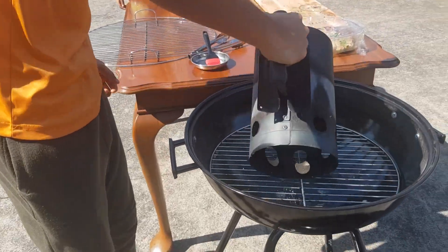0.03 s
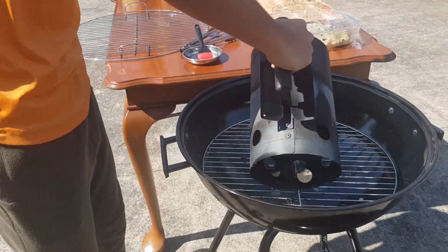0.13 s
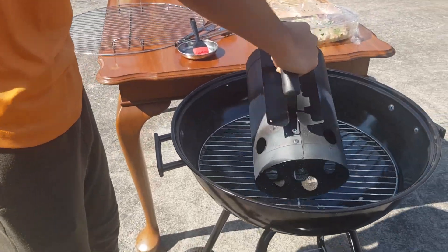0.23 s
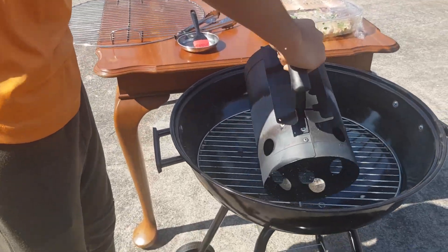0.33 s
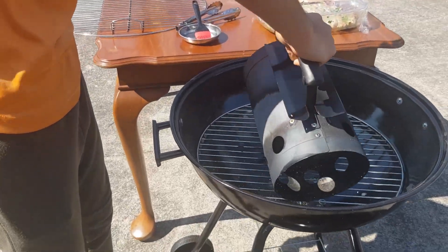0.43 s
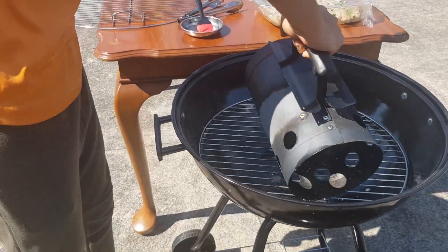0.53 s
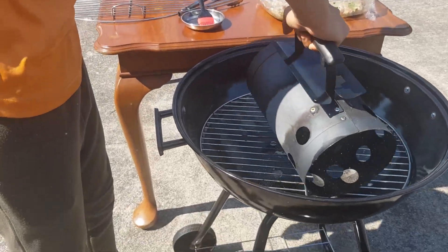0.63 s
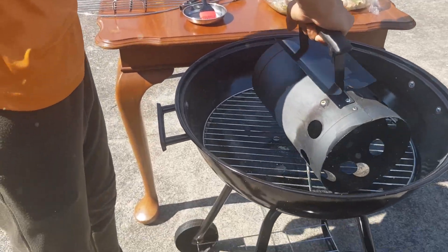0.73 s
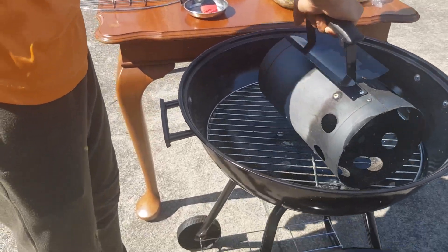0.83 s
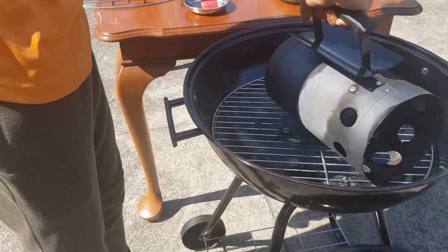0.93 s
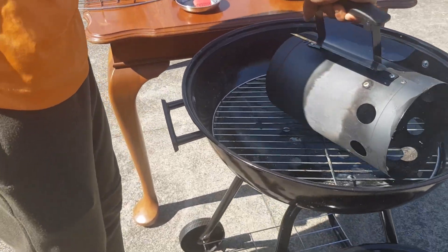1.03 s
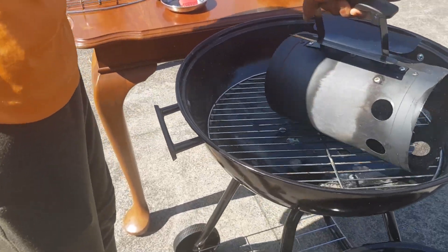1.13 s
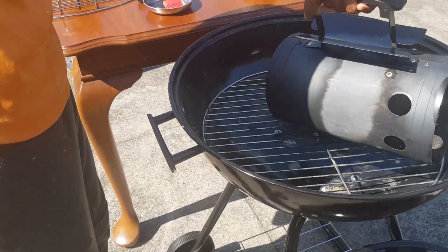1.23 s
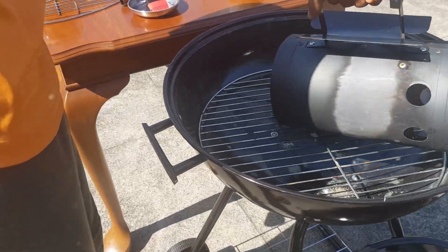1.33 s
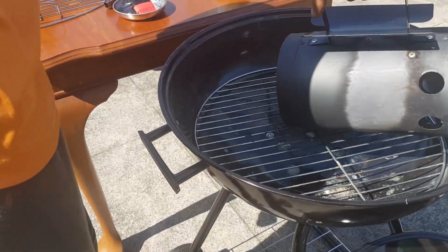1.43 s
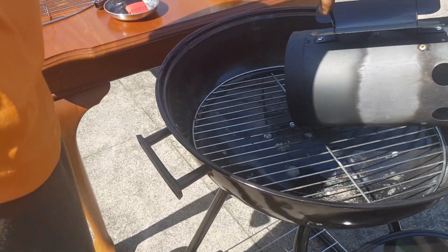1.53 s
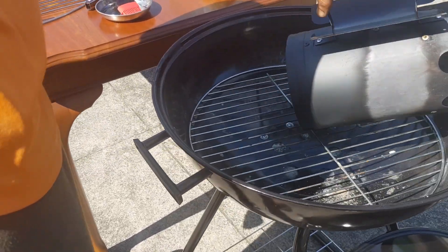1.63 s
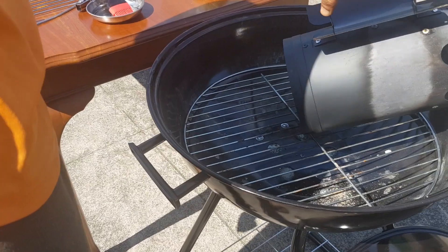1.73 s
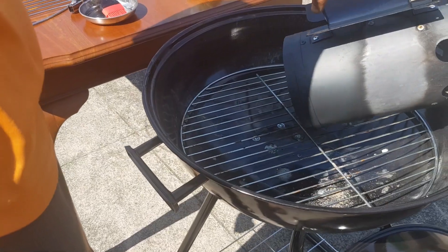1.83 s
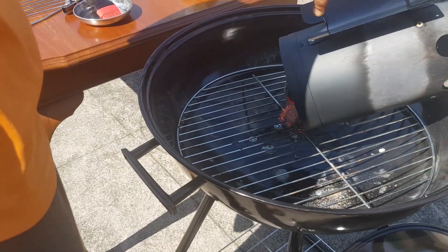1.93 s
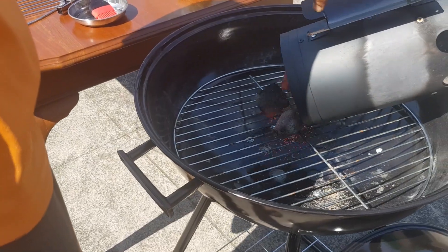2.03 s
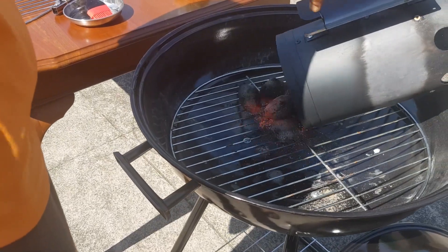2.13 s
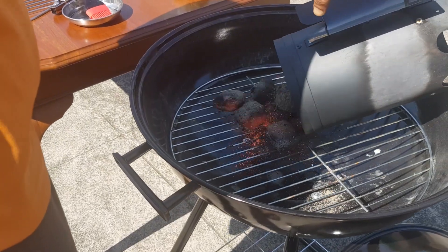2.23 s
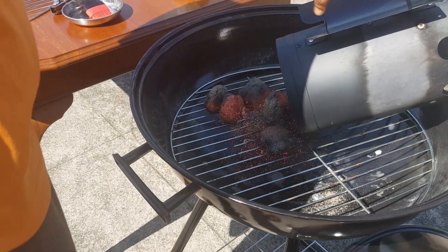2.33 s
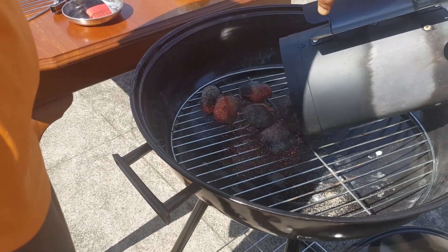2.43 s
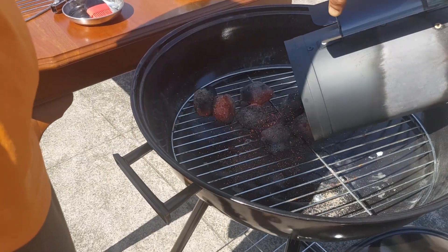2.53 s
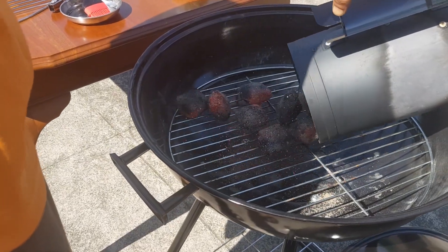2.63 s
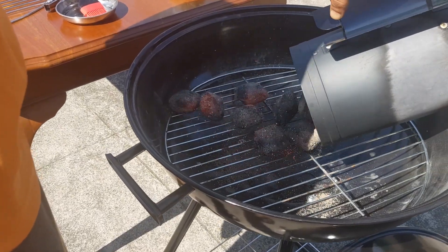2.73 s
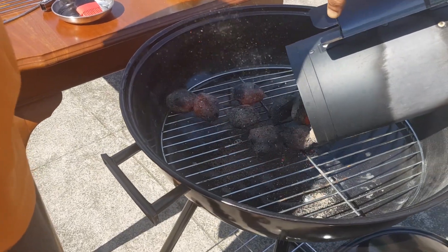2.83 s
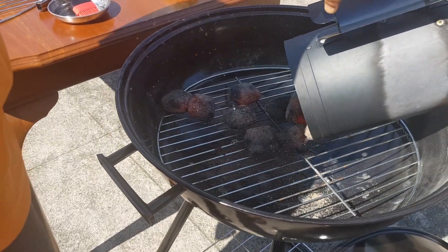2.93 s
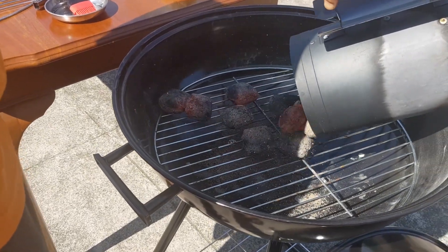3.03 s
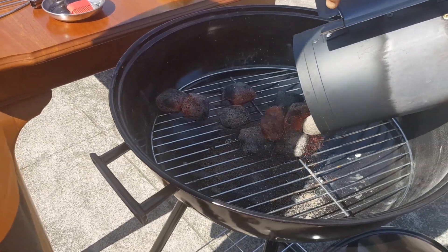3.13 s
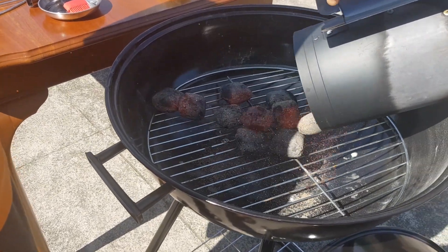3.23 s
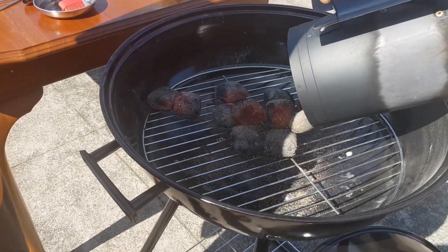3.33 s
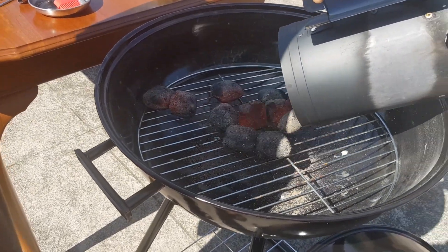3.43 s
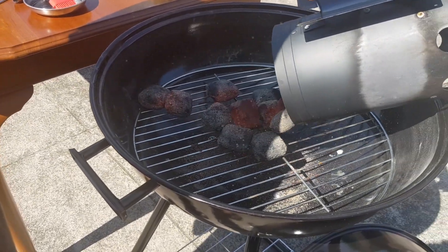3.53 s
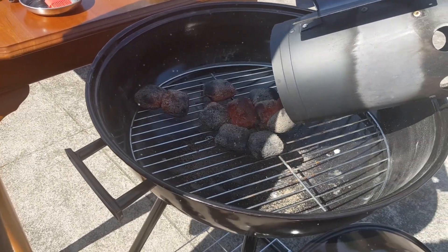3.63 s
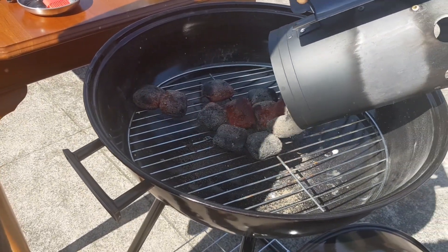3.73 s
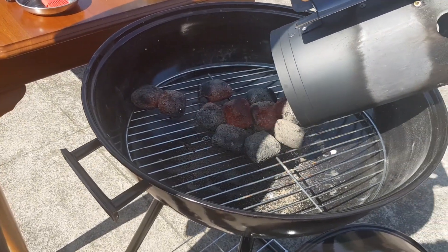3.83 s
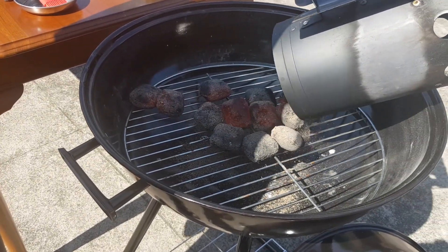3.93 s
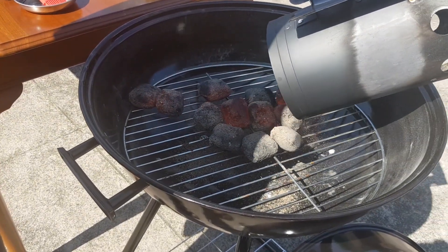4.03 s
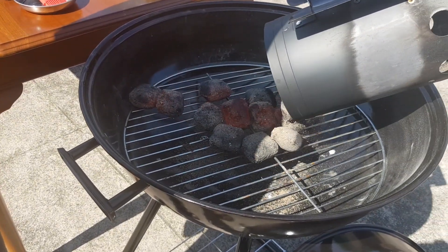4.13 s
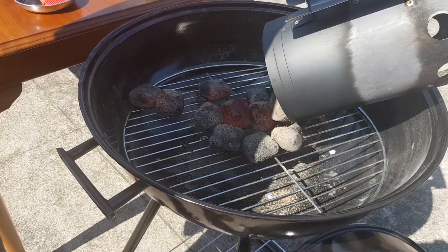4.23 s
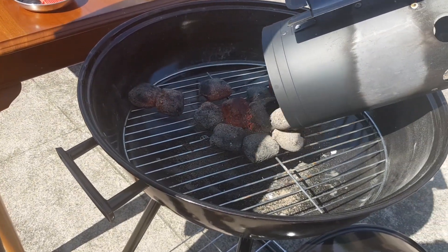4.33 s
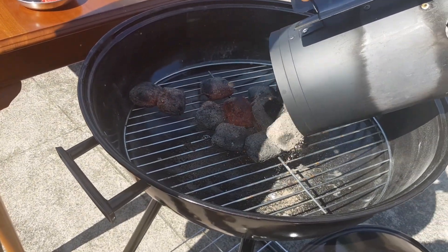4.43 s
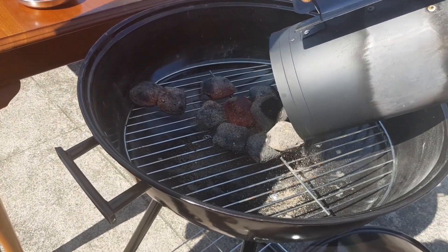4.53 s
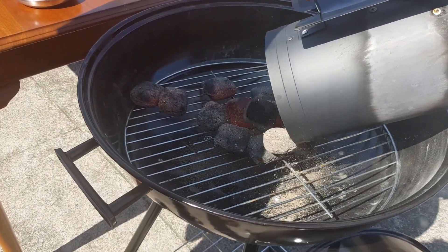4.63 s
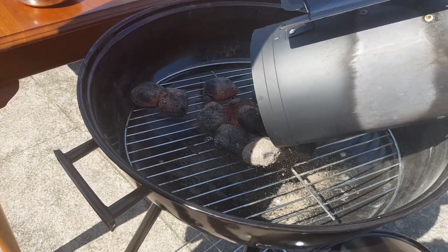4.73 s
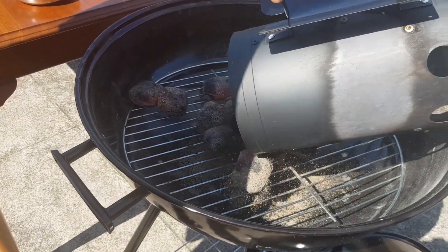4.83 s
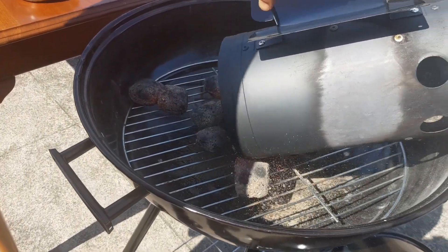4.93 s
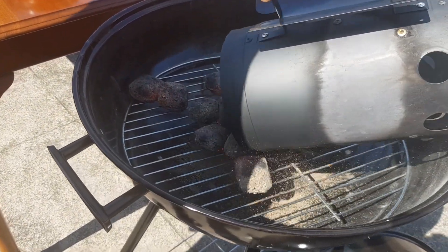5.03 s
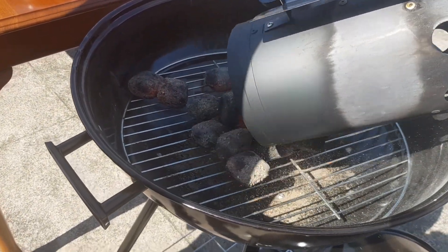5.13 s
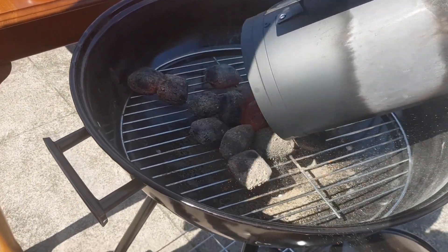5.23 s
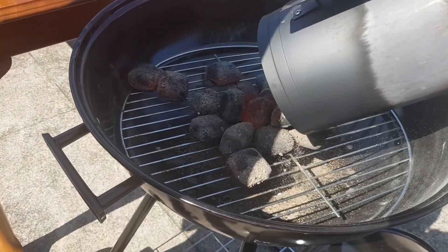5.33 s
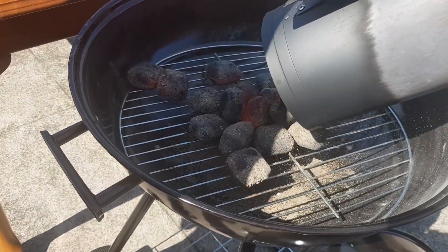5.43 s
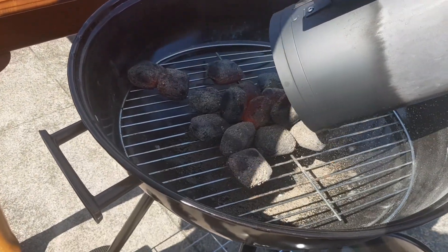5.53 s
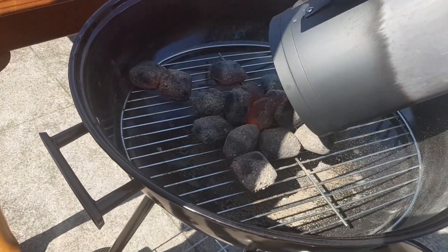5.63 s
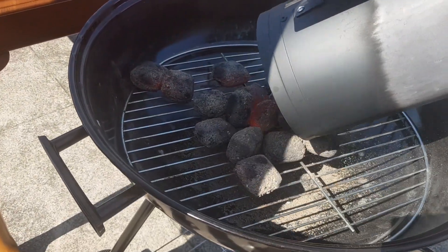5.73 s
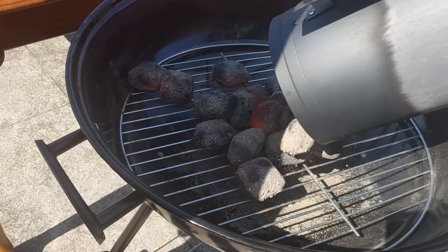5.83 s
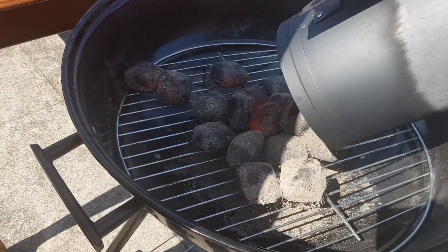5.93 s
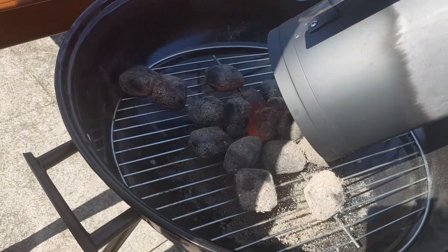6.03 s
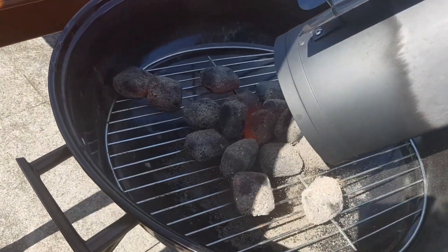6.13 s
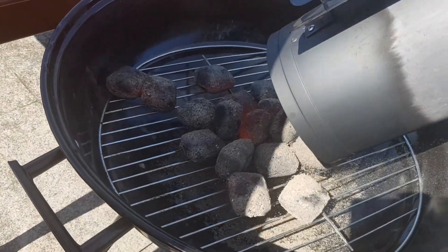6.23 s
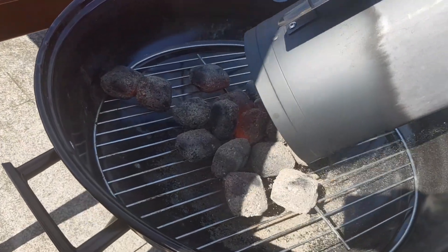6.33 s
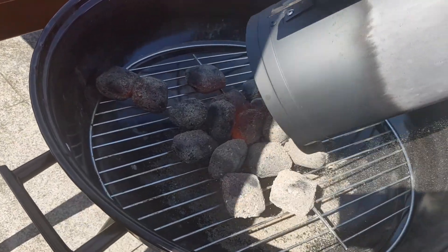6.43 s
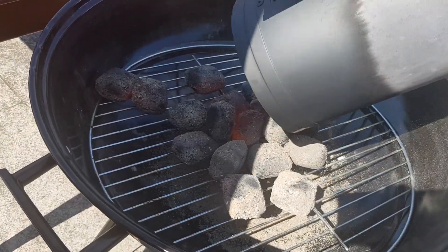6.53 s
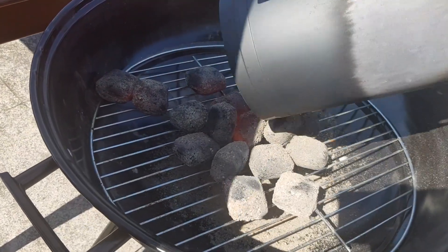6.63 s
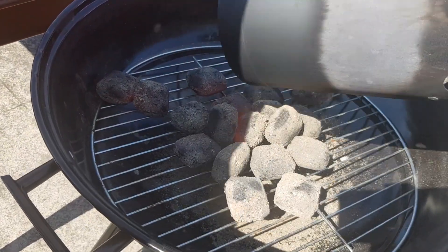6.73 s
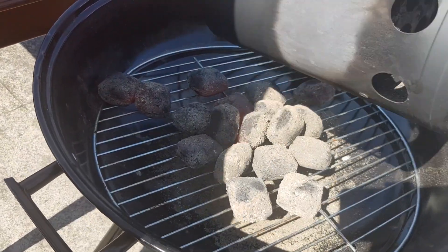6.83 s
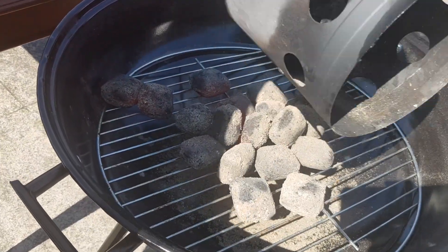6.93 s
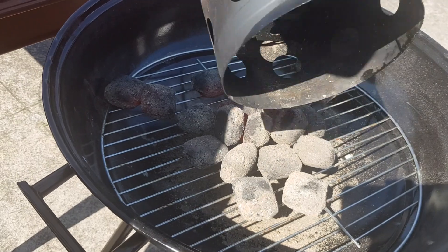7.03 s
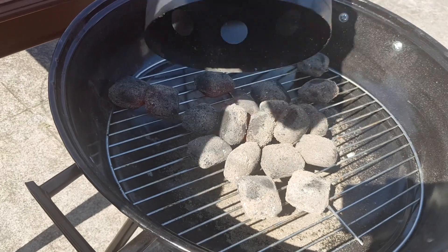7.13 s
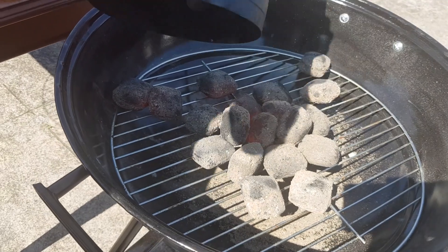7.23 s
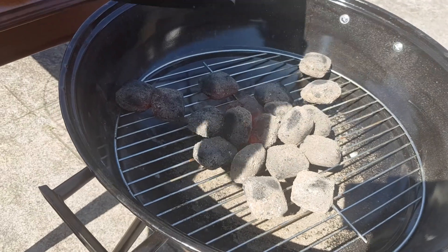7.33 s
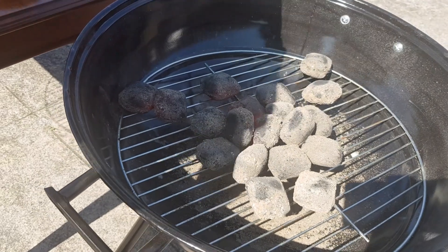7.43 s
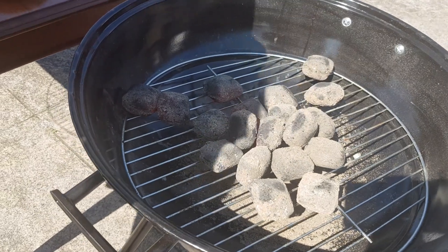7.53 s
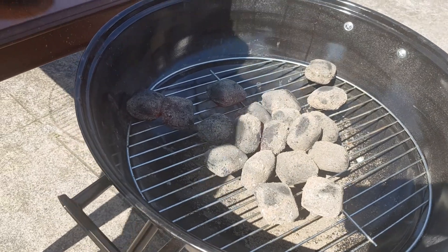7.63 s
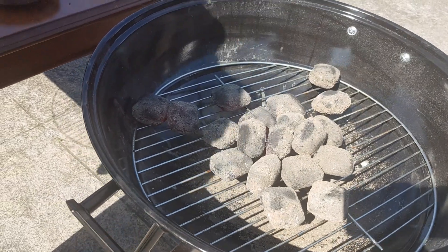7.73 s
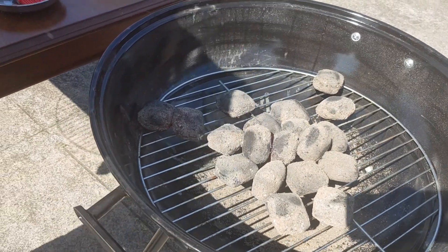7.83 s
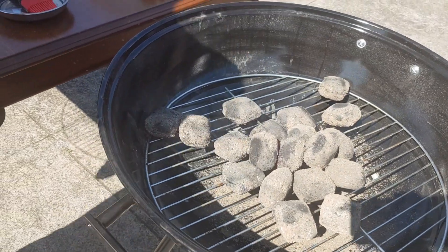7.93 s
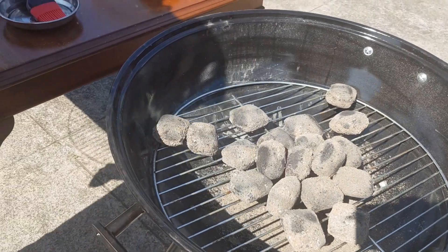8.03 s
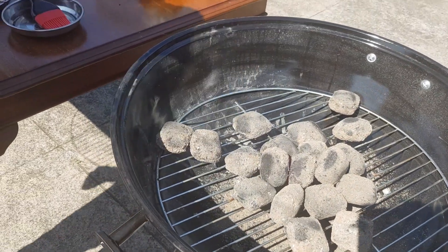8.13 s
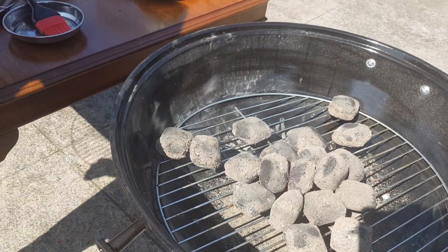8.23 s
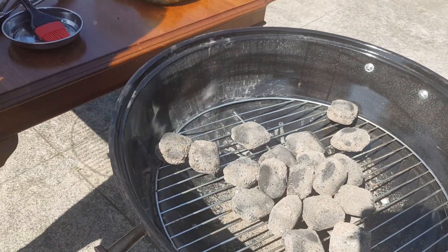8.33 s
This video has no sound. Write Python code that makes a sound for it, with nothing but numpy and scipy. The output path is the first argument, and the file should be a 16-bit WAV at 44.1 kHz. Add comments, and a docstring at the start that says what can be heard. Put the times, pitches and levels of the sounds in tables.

```python
"""Hot charcoal lumps slide out of a sheet-steel chimney onto the wire grate of a round grill, outdoors.
Each landing is a quick cluster of blows that rings bowl, grate and sheet, made of many fading modes;
between them lumps and ash roll as random clicks on the same steel, and small pieces clink or snap.
Gusts, built from short pressure waves, buffet the two microphone ports over a faint outdoor hiss.
Slow modes sing on after some blows, and near the end the lifted chimney scrapes thinly."""
import sys
import numpy as np
from scipy import signal
from scipy.fft import rfft, irfft, next_fast_len
from scipy.io import wavfile
from scipy.ndimage import uniform_filter1d

SR = 44100
rng = np.random.default_rng(int(sys.argv[2]) if len(sys.argv) > 2 else 0)


def output_pcm(signal):
    """Save a mono or channel-first signal as 16-bit PCM at the path in sys.argv[1].

    Samples are clipped to [-1, 1] before scaling.
    """
    pcm = np.clip(np.atleast_2d(signal).T, -1, 1) * 32767
    wavfile.write(sys.argv[1], SR, np.round(pcm).astype(np.int16))


def how_loud(loudness_db):
    """Turn decibels into a plain amplitude multiplier (0 dB gives 1, 20 dB gives 10)."""
    steps = np.asarray(loudness_db, float) / 20
    return 10 ** steps


N = 370080
T = np.arange(N) / SR
SIZE = next_fast_len(N + 2 * SR)  # transform length, with room for the rings to fade

# Levels in the tables are relative: random swings and the final gain come on top.
# What keeps moving between knocks: (time [s], rolling lumps [dB], trickling ash [dB])
ROLLING = [(0.0, -79, -65.5), (0.27, -105, -70), (1.62, -90, -79.5), (1.73, -76, -64.5), (1.83, -64.5, -53),
           (2.0, -38, -46), (2.12, -38, -45.5), (2.28, -42.5, -59.5), (2.46, -52.5, -64),
           (2.98, -66.5, -75), (3.14, -51, -64.5), (3.29, -60.5, -70), (3.78, -69, -61), (3.98, -57, -59),
           (4.44, -68, -70), (4.72, -58, -65.5), (4.99, -59, -61.5), (5.21, -61.5, -60.5),
           (5.42, -74.5, -72.5), (5.75, -68, -67), (5.89, -69.5, -69.5), (6.22, -69.5, -70.5),
           (6.45, -91, -81.5), (7.0, -101, -83)]
# Coal meeting steel, from a chip's tap (2 ms) over a lump's landing (6 ms) to a slide (18 ms):
# (time [s], blow [dB], tumble [ms], bowl share [dB], hardness [dB])
KNOCKS = [(0.122, -28.5, 5.5, -0.5, 10), (0.177, -23, 17.3, -4, 2.5), (0.2755, -32.5, 5.5, 4, 5),
          (0.6888, -28, 14.8, -18, 2), (0.7438, -23.5, 13.6, -4.5, 1), (1.411, -31.5, 12, -16, 8),
          (1.4968, -40.5, 1.45, -6.5, 10.5), (1.824, -7, 5.75, 1.5, -10), (1.9239, 3.5, 4.67, -1.5, -5),
          (1.9738, -1.5, 6.1, -4.5, -1), (2.0202, 10, 5.9, -10.5, -2), (2.0654, 13, 12, -15.5, -2.5),
          (2.084, 10.5, 10.4, -14.5, -3), (2.1114, 11, 7.5, -31.5, -5), (2.1542, 10.5, 6.6, -31.5, -4),
          (2.2063, 9, 8, -19, -4), (2.236, 6, 12, -22, -4.5), (2.41, -2, 8.1, -10, -6),
          (2.6802, -21.5, 2.06, 3, -1), (2.935, -27, 2.73, -0.5, 3.5), (2.984, -31.5, 1.4, -1, 2.8),
          (3.0455, -22, 2.36, 5, -1), (3.077, -20.5, 2.7, 0.5, 0), (3.1188, -36, 2.1, -7, 9),
          (3.16, -20, 2.7, 2, 3.5), (3.23, -12.5, 3.0, 0.5, 3.5), (3.412, -17.5, 1.97, -5, -1),
          (3.7798, -3.5, 7.54, -4, -4.5), (3.9089, 3, 7.84, -4.5, -3.5), (4.0803, -13.5, 17.3, -2.5, -8),
          (4.2389, -21, 7.1, 3, -23), (4.315, -8.5, 5.9, -6.5, -13), (4.375, -17.5, 10.7, 1.5, 3),
          (4.396, -31.5, 5.6, -10, 11.5), (4.5393, -31, 1.95, -4, 5.5), (4.576, -1, 6.36, -4.5, -7.5),
          (4.8018, 1.5, 8, -7, -8), (4.815, 5, 7.76, -5, -3), (4.8798, -4, 13.5, -2.5, -2),
          (4.9386, -16, 19.8, 2, 1), (5.0864, -8.5, 13.7, -3, -11.5), (5.2354, -8.5, 5.7, -1.5, -11.5),
          (5.3809, -15, 5.8, 1, -16), (5.6441, -18.5, 19.7, -7.5, 6), (5.7002, -21, 16, 2.5, -1.5),
          (5.806, -8.5, 5.25, -7.5, -6.5), (5.908, -13, 6.6, -4, -5), (5.9637, 10.5, 5.92, -8, -6.5),
          (5.975, 5, 5.95, -20, -2.5), (6.005, -10.5, 6.2, -13, -24), (6.163, -20, 4.7, -4, -3),
          (6.2414, -13.5, 5, -3.5, -6), (6.2913, -4, 6.15, -9, -8.5), (6.4096, -32, 2.8, 3.5, 0.5),
          (6.672, -35.5, 1.5, -1, -12), (6.787, -44, 2.8, -22, 4), (7.1484, -36.5, 13, 6, 4.5),
          (7.184, -46, 2.1, -5, 5), (7.33, -39, 2.5, -4.5, 6), (7.446, -38, 3.1, -4.5, 2),
          (7.7595, -62.5, 2.3, -4, 16.5), (8.02, -51, 1.8, -2, 1)]
# Spectrum of the ringing steel: (frequency [Hz], level per Hz [dB])
STEEL_COLOUR = [(120, -36.5), (200, -14.5), (543, -8.5), (1060, -20), (1250, -2), (1590, -0.5),
                (1770, -1.5), (2370, -4), (2590, -10.5), (3230, -14), (3600, -17.5), (5180, -16.5),
                (6550, -24.5), (10900, -25), (15400, -38.5)]
# How long the steel takes to fade by 60 dB: (frequency [Hz], fade time [s])
STEEL_FADE = [(200, 0.66), (1500, 0.29), (5000, 0.29), (15000, 0.11)]
# Stereo width of the steel: (frequency [Hz], side minus mid [dB])
STEEL_SIDE = [(200, -20), (380, -24.5), (700, -6.5), (1290, -5), (2380, -0.5), (4400, 0.5), (8120, 1),
              (15000, 2)]
# Modes that stand out of the dense ring: (frequency [Hz], relative level [dB], 60 dB fade time [s])
STRONG_MODES = [(192.8, 13, 0.54), (349.8, 7, 0.4), (1294, -1, .25), (1458, 5, 0.2), (1568, 13.5, 0.3),
                (1637, 10, 0.21), (1667, 11, 0.26), (1840, 5, 0.34), (2007, -2, 0.25), (2130, 0.5, 0.15),
                (2346, 2, .18), (2746, 2, 0.16), (4320, 3.5, 0.15), (4460, 5.5, 0.13), (4925, 1.5, 0.097)]
# Upper edges of bowl, grate and sheet, with grit above: (frequency [Hz])
PART_TOPS = [1000, 2900, 6300]
# Wind on the ports: (time [s], level [dB], left minus right [dB])
GUSTS = [(0.0, -66.5, 3), (0.4, -65.5, -13), (0.63, -50, 3), (0.91, -46, -6), (0.99, -41.5, 1.5),
         (1.47, -41, 1), (1.63, -52, -22), (1.8, -40.5, -14), (2.08, -41, -8.5), (2.2, -50, -10.5),
         (2.73, -44, 7), (2.97, -62.5, -11), (3.2, -51, -20), (3.62, -77, -30), (3.9, -71, -26),
         (4.55, -62, -8), (5.0, -45, -5), (5.19, -53.5, -27), (5.5, -36.5, -4), (5.77, -37, -3),
         (5.88, -54, -22), (5.97, -41.5, -1.5), (6.55, -69.5, -27.5), (6.78, -53.5, -19), (6.92, -66, -34),
         (7.0, -51, -4), (7.14, -64, -26), (7.5, -45.5, 1.5), (8.1, -55, 4), (8.21, -49.5, 15),
         (8.39, -50, -2)]
# Spectrum of the wind: (frequency [Hz], level per Hz [dB])
GUST_COLOUR = [(20, -24.5), (55, 6.5), (102, 0.5), (189, -12.5), (325, -18), (433, -40.5), (676, -48)]
# The hardest wind pops: (time [s], level [dB], pitch [Hz], left minus right [dB])
WIND_POPS = [(0.616, -30, 65, -7), (0.542, -34.5, 76, -1), (0.966, -28, 69.6, -5), (1.011, -23, 94, 3),
             (1.072, -29.5, 86.1, 2), (1.157, -34, 57, -11), (1.445, -20, 65.5, -1), (1.861, -25.5, 54, 2),
             (5.297, -21, 74, 0.2), (5.748, -30, 115, -4), (5.937, -29, 103, -5), (7.459, -32, 103.4, -1),
             (7.579, -32, 81.5, 2), (7.697, -35, 119, 6.5), (7.872, -35.5, 59, -2), (1.162, -43, 298, 13),
             (1.254, -44, 326, 3), (1.289, -33.5, 240, -2), (6.744, -42, 294, 3), (8.072, -39, 90.2, 0),
             (8.249, -47, 370, -11), (8.273, -45.5, 190, 8.5)]
# Spectrum of the outdoor hiss: (frequency [Hz], level per Hz [dB])
AIR_COLOUR = [(180, -25.5), (330, -1.5), (433, -6), (800, -16.5), (1900, -22.5), (4370, -12.5),
              (6410, -22.5), (11500, -22), (15200, -19.5)]
# Single pieces clinking or thudding on thin sheet, each at the pitch of its size:
# (time [s], level [dB], pitch [Hz])
TICKS = [(0.1194, -45.5, 2186), (0.3331, -50, 4200), (0.4053, -46, 4320), (0.4534, -52, 4150),
         (0.488, -50.5, 4200), (1.821, -33, 507), (1.875, -37.5, 510), (2.022, -29, 334), (2.081, -32, 413),
         (2.196, -38, 350), (2.245, -36.5, 395), (2.6768, -45.5, 1620), (3.0762, -35.5, 1495),
         (3.232, -44.5, 1380), (3.4094, -49, 1654), (4.028, -46, 1380), (4.183, -48.5, 3600),
         (4.239, -48, 397), (4.317, -43.5, 1600), (4.414, -43.5, 2270), (4.536, -54, 2480),
         (4.864, -39.5, 1460), (5.103, -42, 412), (6.165, -49, 2360), (6.365, -51.5, 1910),
         (5.8103, -30, 1576), (6.59, -58.5, 600), (6.6722, -56, 1560), (7.175, -58.5, 893),
         (7.3304, -56.5, 2246)]
# Slow modes of bowl and wire that sing on after some blows:
# (time [s], level [dB], pitch [Hz], 60 dB fade time [s])
SINGING_MODES = [(3.91, -74.5, 748.5, 2.1), (4.81, -56.5, 754, 3.4), (4.885, -47, 3200, .35),
                 (5.645, -51, 2280, 0.32), (5.69, -47, 3330, 0.23), (5.97, -65.5, 746, 2.1),
                 (6.3, -64, 747, 2.0), (6.69, -68.5, 2235, 0.37)]
# The lifted chimney scrapes thinly: (time [s], pitch [Hz], level [dB])
SCRAPE = [(7.0, 2820, -76), (7.07, 2520, -69), (7.12, 2860, -74), (7.17, 2700, -78)]

SPOTS = 4  # places on the steel that can be struck
CRACK, CRACK_S = 3.36, 0.0059  # extra strength and decay of the first instant, before coal damps the steel
# first touch against all later ones: at a tumble of 1 ms, and per doubling of the tumble
FIRST_DB, FIRST_DB_PER_DOUBLING = 9, -7
# harder contact lifts the sheet by the hardness and the grit by more
GRIT_DB, GRIT_PER_HARDNESS = -6.5, 1.6
SHIFT_SCALE = 2.0  # dB per unit of walk(): rolling pieces wander between bowl, grate, sheet and grit
HOLLOW_HZ, HOLLOW_Q, HOLLOW_DEPTH = 960, 2.5, 0.6  # the dip between bowl and grate; depth 0-1
# stronger wind brings smaller eddies: extra dB per octave for each dB of gust above the usual
GUST_USUAL_DB, GUST_BRIGHTENS = -49, 0.064
PORT_LAG_CYCLES = 0.25  # the wave of a hard pop lags this much at the right port
WIND_LOW_HZ = 48.7  # the wind holds little below this pitch
# 60 dB fade time at this pitch; small pieces and dull thuds die sooner
TICK_FADE_S, TICK_FADE_HZ = 0.11, 1600
# a chip's tap (tumble under TAP_MS) also snaps drily: levels against the blow, pitches of snap and wire ping
TAP_MS, SNAP_DB, SNAP_HZ, PING_DB, PING_HZ = 4, -13, 1800, -26, 5050


def on_log(table, hz):
    """Read a (frequency, value) table on a logarithmic pitch scale."""
    at, value = np.transpose(table)
    return np.interp(np.log(np.maximum(hz, 1)), np.log(at), value)


def in_time(table):
    """Draw the columns of a (time, value, ..) table as curves, one value a sample."""
    s, *columns = np.transpose(table)
    return np.array([np.interp(T, s, column) for column in columns])


def walk(rate):
    """Random levels, rate of them a second, smoothed twice; spread near 1.6."""
    k = int(SR / rate)
    steps = np.repeat(rng.standard_normal(N // k + 1), k)
    return 2.224 * uniform_filter1d(uniform_filter1d(steps, k), k)[:N]


def grains(rate, scatter_db):
    """Clicks at random moments, a few much larger than the rest; rms 1."""
    chance = rng.random((3, N))
    happens = chance[0] < rate / SR
    size = how_loud(scatter_db * np.minimum(-np.log(1 - chance[2]), 3.5))
    x = happens * np.sign(chance[1] - 0.5) * size
    return x / np.sqrt(np.mean(x ** 2))


def add_at(out, s, wave):
    """Mix a short wave into out, in place, from time s on."""
    start = int(s * SR)
    out[:, start:start + wave.shape[-1]] += wave


def pop(hz, cycles, phase):
    """A short push of air: a few cycles at most under a smooth hump, peak near 1."""
    t = np.arange(int(cycles * SR / hz))
    return np.hanning(len(t)) * np.sin(2 * np.pi * (hz * t / SR + phase))


def shifting(rate):
    """A wandering dB offset for each part of the steel."""
    return SHIFT_SCALE * np.array([walk(rate) for _ in range(4)])


def rolling():
    """Lumps and ash tap the steel as streams of random clicks; returns force as (part, spot, time)."""
    force = np.zeros((4, SPOTS, N))
    lumps, ash = how_loud(in_time(ROLLING)) * (T < ROLLING[-1][0])
    ash = ash * how_loud(3.0 * walk(8.0))
    # how strongly each reaches bowl, grate, sheet and grit [dB]
    lumps = np.outer(how_loud([-10, 0, -5.5, -21]), lumps)
    ash = np.outer(how_loud([-10.5, -13.5, -2.5, -0.5]), ash)
    for spot in range(SPOTS):
        force[:, spot] += lumps * grains(220, 3.3) * how_loud(2.4 * walk(30) + shifting(14))
        force[:, spot] += ash * grains(330, 3.8) * how_loud(2.2 * walk(20) + shifting(9))
    return force


def tumbling(count=30):
    """Each blow: a first touch, then corners and bounces that crowd in and thin out, mostly near one spot."""
    force = np.zeros((4, SPOTS, N))
    chance = rng.random((len(KNOCKS), count, 5))
    for (s, db, tumble_ms, bowl_db, hard_db), c in zip(KNOCKS, chance):
        late = -tumble_ms / 1000 * np.log((1 - c[:, 0]) * (1 - c[:, 4]))
        size = how_loud(6.85 * c[:, 1]) * np.sign(c[:, 2] - 0.5)
        size = size / np.sqrt(np.sum(size ** 2)) * how_loud(db)
        late[0] = 0
        size[0] = how_loud(db + FIRST_DB + FIRST_DB_PER_DOUBLING * np.log2(tumble_ms))
        strays = c[:, 3] < 0.3  # these touches hit the next spot
        spot = (int(c[0, 0] * SPOTS) + strays) % SPOTS
        share = how_loud([bowl_db, 0, hard_db, GRIT_DB + GRIT_PER_HARDNESS * hard_db])
        moment = ((s + late) * SR).astype(int)
        np.add.at(force, (slice(None), spot, moment), np.outer(share, size))
    return force


def ring(hz, db, fade_s, length_s, mid):
    """Fading modes, with other strengths for each spot struck; returns (part, spot, ear, time)."""
    t = np.arange(int(length_s * SR)) / SR
    waves = np.sin(2 * np.pi * np.outer(hz, t)) * np.exp(-np.log(1000) * np.outer(1 / fade_s, t))
    side = rng.standard_normal((SPOTS, 1, len(hz))) * np.array([[1], [-1]])
    gain = (mid + how_loud(on_log(STEEL_SIDE, hz)) * side) * how_loud(db) / np.sqrt(fade_s)
    # neighbouring parts share the modes near their common edge
    above = [1 / (1 + (top / hz) ** 12) for top in PART_TOPS]
    parts = -np.diff([1 + 0 * hz, *above, 0 * hz], axis=0)
    crack = 1 + CRACK * np.exp(-t / CRACK_S)
    return np.array([(gain * part) @ waves * crack for part in parts])


def steel():
    """Spectra of the steel's parts: a dense field of modes and a few strong ones, each part of energy 1."""
    hz = np.sort(150 + 16000 * rng.random(900) ** 1.3)
    spacing_db = 10 * np.log10(uniform_filter1d(np.gradient(hz), size=25))
    chance = rng.standard_normal((2, SPOTS, 1, len(hz)))
    spot_db = 8 * uniform_filter1d(chance[0], size=30)  # each spot favours some regions
    dense_db = on_log(STEEL_COLOUR, hz) + spacing_db
    dense = ring(hz, dense_db, on_log(STEEL_FADE, hz), 0.35, chance[1] * how_loud(spot_db))
    hz, db, fade_s = np.transpose(STRONG_MODES)
    mid = rng.uniform(0.4, 1.3, (SPOTS, 1, len(hz)))
    body = ring(hz, on_log(STEEL_COLOUR, hz) + db + 13, fade_s, 1.5, mid)
    body[..., :dense.shape[-1]] += dense
    return rfft(body / np.sqrt(np.sum(body ** 2, (2, 3), keepdims=True) / 2), SIZE)


def charcoal():
    """Every touch rings the steel from its spot; the bowl's echo, a fixed dip here, cancels one band."""
    force = rolling() + tumbling()
    rung = irfft(np.sum(rfft(force, SIZE)[:, :, None] * steel(), (0, 1)), SIZE)[:, :N]
    hollow = signal.lfilter(*signal.iirpeak(HOLLOW_HZ, HOLLOW_Q, SR), rung)
    # the lowest rumble is cut away
    no_bass = signal.butter(2, 130, "high", fs=SR, output="sos")
    return signal.sosfilt(no_bass, rung - HOLLOW_DEPTH * hollow)


def wind():
    """Eddies of several sizes thump each port on its own; the pitch rises as they get smaller."""
    db, pan_db = in_time(GUSTS)
    flutter = how_loud(2.1 * np.array([walk(22), walk(22)]))
    lull = walk(8.2)
    tilt = GUST_BRIGHTENS * (db - GUST_USUAL_DB) + 0.8 * lull  # dB per octave
    out = 0
    for hz in 42 * 2 ** np.arange(0, 4.1, 0.5):
        eddies = flutter * np.array([grains(12 + hz / 5, 3.2) for _ in range(2)])
        eddies = signal.oaconvolve(eddies, pop(hz, 2.25, rng.random())[None], axes=1)[:, :N]
        level_db = on_log(GUST_COLOUR, hz) + np.log2(hz / 60) * tilt
        out = out + eddies / eddies.std() * np.sqrt(hz) * how_loud(level_db)
    out = signal.sosfilt(signal.butter(2, WIND_LOW_HZ, "high", fs=SR, output="sos"), out)
    out = out / out.std() * how_loud(db + np.array([pan_db, -pan_db]) / 2)
    for s, db, hz, pan_db in WIND_POPS:
        phase = rng.random() - np.array([[0], [PORT_LAG_CYCLES]])
        ears_db = db + np.array([[pan_db], [-pan_db]]) / 2
        add_at(out, s, pop(hz, 1.81, phase) * how_loud(ears_db))
    return out


def air():
    """Smooth outdoor hiss: filtered noise, different in each ear, drifting slightly."""
    filter_gain = how_loud(on_log(AIR_COLOUR, np.fft.rfftfreq(SIZE, 1 / SR)))
    hiss = irfft(rfft(rng.standard_normal((2, N)), SIZE) * filter_gain, SIZE)[..., :N]
    return hiss / np.sqrt(np.mean(hiss ** 2)) * how_loud(-67 + 0.6 * walk(3))


def clink(out, s, hz, db, fade_s):
    """Add three close modes struck at once, in other phases at each ear; low ones arrive nearly alike."""
    t = np.arange(SR // 8) / SR
    mode_hz = hz * (1 + 0.03 * rng.standard_normal((3, 1, 1)))
    ear_phase = rng.random((3, 2, 1)) * min(hz / TICK_FADE_HZ, 1) ** 2
    modes = np.sin(2 * np.pi * (mode_hz * t + ear_phase))
    add_at(out, s, how_loud(db) * modes.sum(0) * 1000 ** (-t / fade_s))


def ticks():
    """Each small piece clinks or thuds once, fading at a rate set by its pitch."""
    out = np.zeros((2, N))
    for s, db, hz in TICKS:
        fade_s = TICK_FADE_S * min(TICK_FADE_HZ / hz, np.sqrt(hz / TICK_FADE_HZ))
        clink(out, s, hz, db, fade_s)
    return out


def snaps():
    """A single sharp push of air and a short ping of the wire at every chip's tap."""
    out = np.zeros((2, N))
    for s, db, tumble_ms, *_ in KNOCKS:
        if tumble_ms < TAP_MS:
            add_at(out, s, pop(SNAP_HZ, 1.5, 0) * how_loud(db + SNAP_DB))
            clink(out, s, PING_HZ, db + PING_DB, TICK_FADE_S * TICK_FADE_HZ / PING_HZ)
    return out


def singing():
    """Slow modes of bowl and wire: pure tones that fade with a rough waver."""
    out = 0
    for s, db, hz, fade_s in SINGING_MODES:
        size = how_loud(db) * (T > s) * np.exp(-np.log(1000) * np.maximum(T - s, 0) / fade_s)
        out = out + uniform_filter1d(size, size=400) * np.sin(2 * np.pi * hz * T)  # softened start
    return out * how_loud(2.6 * walk(30))


def scrape():
    """A narrow, breathy glide: a tone and its octave, roughened by slow noise."""
    hz, db = in_time(SCRAPE)
    rough = uniform_filter1d(rng.standard_normal((2, N)), size=110)
    sounding = (T > SCRAPE[0][0]) & (T < SCRAPE[-1][0])
    phase = 2 * np.pi * np.cumsum(hz) / SR
    tone = np.sin(phase) + how_loud(-9) * np.sin(2 * phase)
    return rough / rough.std() * tone * how_loud(db + 2.0 * walk(69)) * sounding


def scene():
    """Charcoal on steel, wind, air, ticks, snaps, singing modes and scrape together."""
    return charcoal() + wind() + air() + ticks() + snaps() + singing() + scrape()


def low_pass(x):
    """Removes everything above the highest recorded frequency."""
    return signal.sosfilt(signal.butter(12, 16660, fs=SR, output="sos"), x)


def record(dry):
    """Raise the level and gently round the loudest peaks."""
    mix = np.tanh(0.84 * dry) / 0.56
    return low_pass(mix)


dry = scene()
out = record(dry)
output_pcm(out)
```